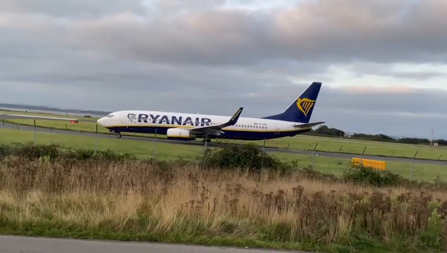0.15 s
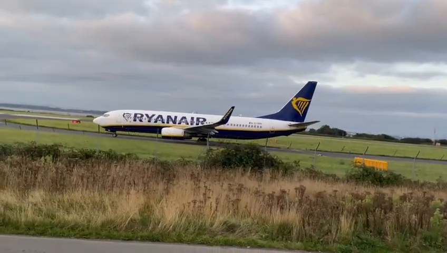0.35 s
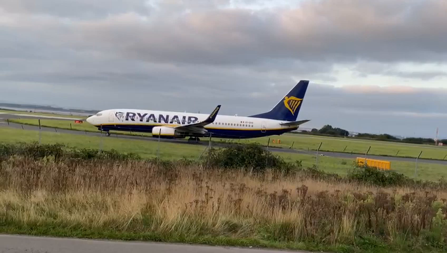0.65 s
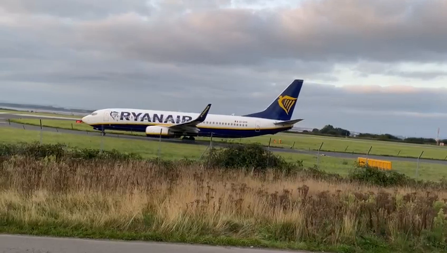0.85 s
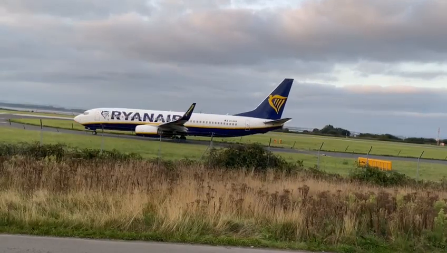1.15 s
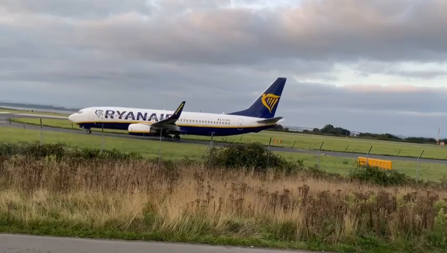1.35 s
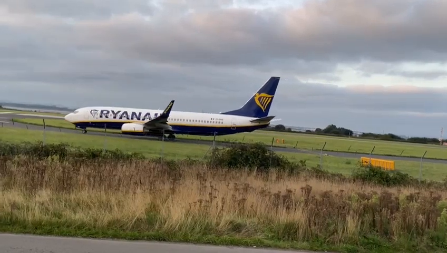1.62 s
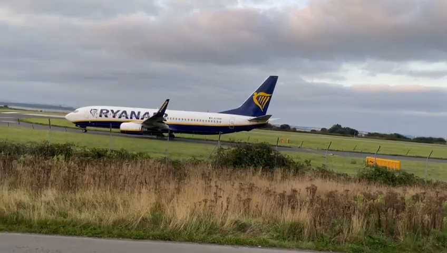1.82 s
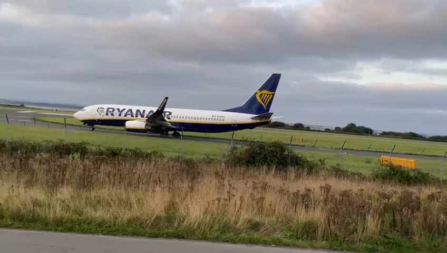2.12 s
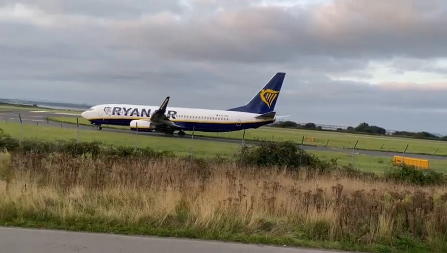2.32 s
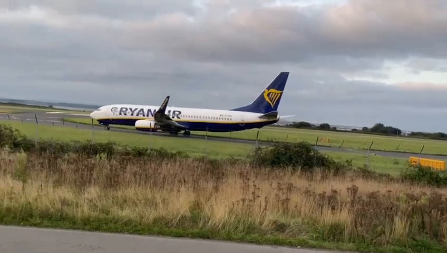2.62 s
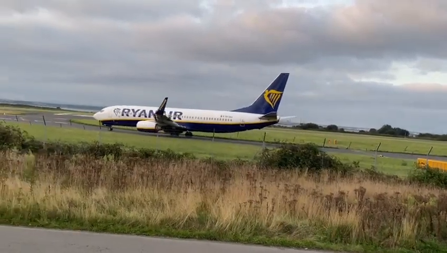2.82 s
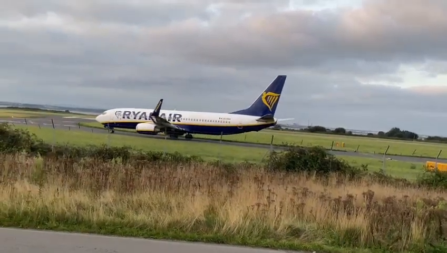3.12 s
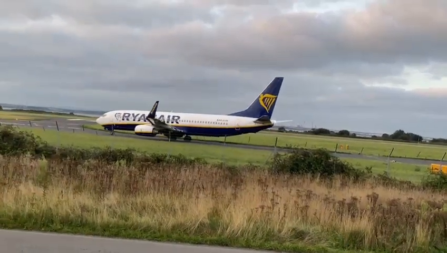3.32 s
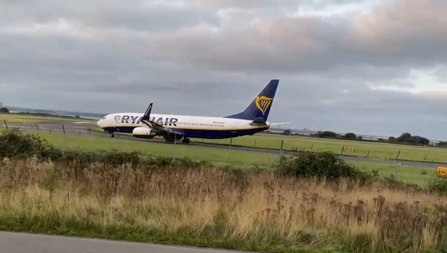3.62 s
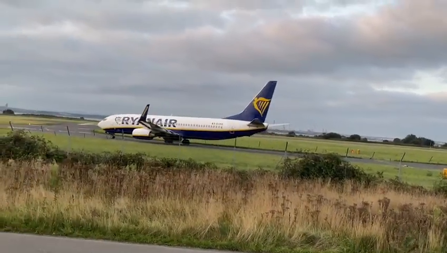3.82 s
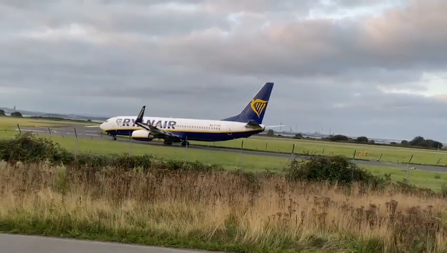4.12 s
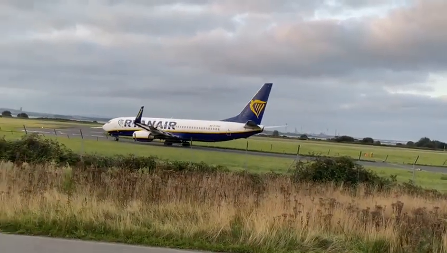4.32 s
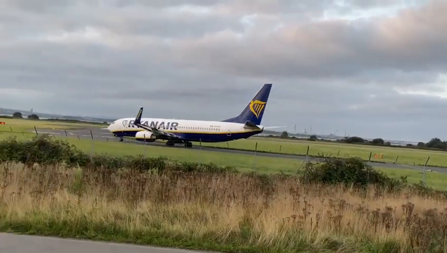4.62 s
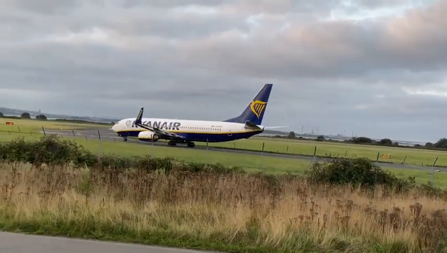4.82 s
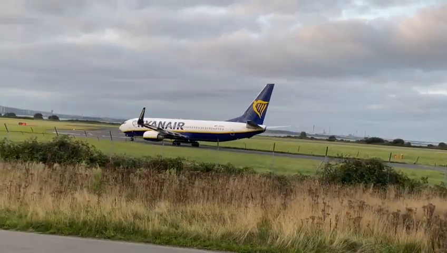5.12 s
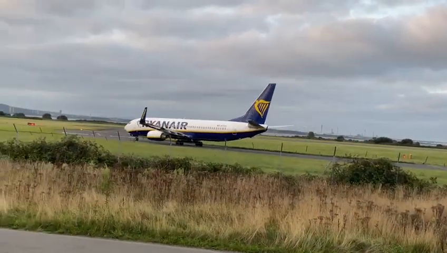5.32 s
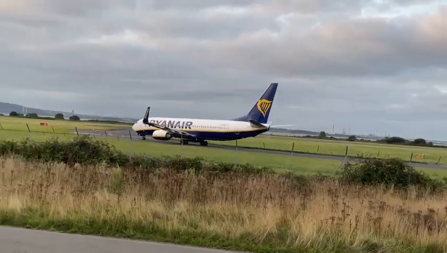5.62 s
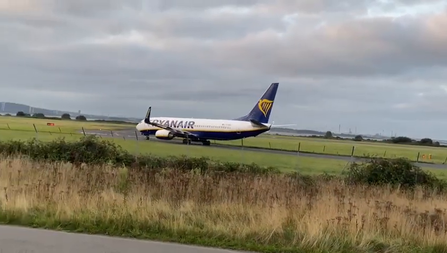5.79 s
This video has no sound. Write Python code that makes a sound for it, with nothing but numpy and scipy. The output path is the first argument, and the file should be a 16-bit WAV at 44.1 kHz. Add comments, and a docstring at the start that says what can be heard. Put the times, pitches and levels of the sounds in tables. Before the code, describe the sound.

An airliner taxis past on an open airfield, heard through a phone at the fence. Its jet engines make a continuous, hissing roar over an uneven low rumble. Thin, high whining tones swell and fade, sinking very slightly in pitch. The roar grows a little louder and higher around the middle, then drops lower and eases as the plane turns away, with more hiss at the end. Moving air makes the sound waver.

```python
"""At the fence of a grass airfield, a phone hears an airliner taxi past and turn away.
The exhaust roars and hisses, burning fuel rumbles, and the spinning blades whine, sinking in pitch as
the plane moves off. A bounce off the soft ground colours the roar, and moving air makes the sound waver.
More roar scatters in from the sides, and a faint low flutter comes and goes."""
import sys
import numpy as np
from scipy import signal
from scipy.fft import rfft, irfft, next_fast_len
from scipy.io import wavfile
from scipy.ndimage import uniform_filter1d

SR = 44100
rng = np.random.default_rng(int(sys.argv[2]) if len(sys.argv) > 2 else 0)


def master_out(mix):
    """Clip the mix to full scale and print it as 16-bit PCM to the path in sys.argv[1]."""
    frames = np.transpose(np.atleast_2d(mix))
    ceiling = np.clip(frames, -1, 1)
    pcm = np.round(ceiling * 32767).astype(np.int16)
    wavfile.write(sys.argv[1], SR, pcm)


N = 262527
TIME = np.arange(N) / SR
SIZE = next_fast_len(N)
HZ = np.arange(SIZE // 2 + 1) * SR / SIZE + 1e-3  # the frequencies of a spectrum


def roar(patchy_db=1.21, hump_octaves=0.16, ground_ms=1.3, ground_radians=-1.29, grass_hz=3000):
    """Exhaust noise, reshaped moment by moment by the turning plane, the ground and the air."""
    # The tail swings round. Each row: time in seconds, relative level in dB, centre of a loud hump in Hz,
    # lift of the hiss in dB, lift of the highest treble in dB.
    exhaust = [(0.0, -27, 736, -5.5, -5), (0.5, -26.5, 795, -3.5, -1.5), (1.27, -26.5, 998, -0.5, 0.5),
               (1.9, -25.5, 1060, -0.5, -2), (2.55, -25.5, 1130, -0.5, -1), (2.98, -24, 1200, -1.5, -6),
               (3.4, -24, 1130, -1, -3), (3.82, -24, 940, -3, -2.5), (4.68, -26, 770, 1, 0),
               (5.1, -26, 720, -1, -0.2), (5.52, -27, 780, 1.5, 1), (5.95, -28.5, 800, 3.5, 5)]
    # The roar's basic tone. Each row: frequency in Hz, level in dB.
    colour = [(170, -36), (200, -18), (270, -8), (330, -3.5), (600, -3), (850, -3.5), (1250, -3),
              (1900, -8), (2150, -11.5), (2650, -13.5), (3900, -21), (4700, -17.5), (7000, -24.5),
              (8100, -22), (9400, -32), (9900, -30), (11600, -74)]
    # The centres, in Hz, of six zones from low roar to highest treble.
    zones_hz = 400, 950, 1700, 2800, 4700, 8000
    # Steady peaks and dips. Each row: frequency in Hz, width in Hz, lift in dB.
    ridges = [(432, 140, 1), (1164, 82, 2.5), (2660, 66, 1), (3540, 250, 2), (552, 21, -5.5),
              (2000, 26, -4), (4080, 110, -1.5), (5820, 320, -1)]
    # Bands that swell or thin for a while. Each row: frequency in Hz, width in Hz, time in seconds,
    # lift in dB, half length in seconds.
    swells = [(247, 44, 2.95, -10, 0.82), (364, 37, 3.8, 2, 0.65), (372, 28, 5.7, 0, 0.71),
              (690, 97, 1.4, -0.5, .5), (2050, 130, 2.62, 4, 0.22), (2680, 410, 5.77, 3.5, 0.32),
              (730, 52, 4.7, 4, 0.24), (4500, 180, 1.05, 3.5, 0.27), (4500, 170, 5.1, -5, 0.77),
              (870, 47, 6.3, 1.5, 0.17), (560, 88, 3.7, -4, 0.71), (9100, 810, 2.3, 5.5, 0.81),
              (2670, 300, .3, 2, .15), (2650, 250, 1.4, 1.5, .3), (1050, 150, 4.9, 2, 0.23),
              (885, 60, 3.4, 3.5, 0.42), (374, 42, 3.0, -1, 0.23)]
    hz, seconds, frames = signal.stft(irfft(noise(colour), SIZE)[:N], SR, nperseg=1024)
    hz = hz[:, None]
    octave = np.log2(hz + 1)
    times, roar_db, *columns = np.transpose(exhaust)
    hump_hz, hiss_db, top_db = (np.interp(seconds, times, column) for column in columns)
    # the lower the hump sits, the more it stands out and the weaker the zones beside it
    height = np.log2(hump_hz / 1000)
    hump_db = 2.5 - 6.5 * height
    zone_db = np.array([2.5 * height, 0 * seconds, 1.5 * height - 0.4, 0.19 * top_db, hiss_db, top_db])
    blend = np.array([np.interp(octave[:, 0], np.log2(zones_hz), row) for row in np.eye(len(zones_hz))])
    db = blend.T @ zone_db + hump_db * bell(octave, np.log2(hump_hz), hump_octaves)
    db += sum(lift * bell(hz, at, width) for at, width, lift in ridges)
    db += sum(lift * bell(hz, at, width) * bell(seconds, when, half)
              for at, width, when, lift, half in swells)
    # swirls of air swell and thin patches a sixth of an octave wide
    swirls = rng.standard_normal((70, len(seconds)))
    swirls = uniform_filter1d(uniform_filter1d(swirls, size=30), size=30)
    patch = np.clip(6 * (octave[:, 0] - 7), 0, 68).astype(int)
    db += patchy_db * swirls[patch] / swirls.std()
    # a late, dull copy off the grass grows with time, boosting some pitches and weakening others
    bounce = (0.022 + 0.026 * seconds) / (1 + (hz / grass_hz) ** 4)
    ground = 1 + bounce * np.exp(1j * (2 * np.pi * hz * ground_ms / 1000 + ground_radians))
    shaped = signal.istft(frames * undb(db) * ground, SR, nperseg=1024)[1][:N]
    running_level = np.sqrt(uniform_filter1d(shaped ** 2, SR))
    return shaped / running_level * undb(np.interp(TIME, times, roar_db) + 2.0)


def rumble(gain_db=-23, evenness=0.42, even_s=0.056, deep_hz=110):
    """A low rumbling noise, smoothed, with brief chance peaks in its deep part placed by hand."""
    # The rumble's tone. Each row: frequency in Hz, level in dB.
    colour = [(20, -33), (35, -18), (43, -20.5), (52, -2.5), (65, 2), (100, -4.5), (155, -8), (175, -13),
              (205, -35), (260, -34), (330, -43)]
    # Chance peaks. Each row: time in seconds, lift of the deep part in dB, half length in seconds.
    peaks = [(0.06, 4, .02), (0.3, 3.5, 0.023), (0.47, 4, 0.047), (1.35, 0, .03), (1.84, 5, 0.026),
             (1.98, 3, .015), (2.31, 7, .04), (2.7, 4, 0.043), (3.02, 7, 0.038), (3.43, 4, 0.034),
             (3.95, 1, .025), (4.25, 1.5, 0.045), (4.52, 6, 0.034), (4.68, 10, 0.014), (5.1, 6, 0.046),
             (5.41, 11, 0.016), (5.9, 8, 0.036)]
    spectrum = noise(colour)
    deep_share = 1 / (1 + (HZ / deep_hz) ** 4)
    deep, upper = (irfft(spectrum * part, SIZE)[:N] for part in (deep_share, 1 - deep_share))
    power = uniform_filter1d(uniform_filter1d(deep ** 2, int(even_s * SR)), int(even_s * SR / 2))
    deep *= (np.mean(power) / power) ** (evenness / 2)
    peak_db = bumps(peaks)
    both = deep * undb(peak_db - 1) + upper * undb(0.16 * peak_db)
    return both / np.sqrt(np.mean(power)) * undb(gain_db - 0.01 * TIME)


def blades(start_hz=2686, sink_hz_per_s=7.5, slowing_hz_per_s2=0.9):
    """Spinning blades whine and sink in pitch together; rough air smears the highest tone."""
    # Each row is a tone: multiple of the rate at which blades pass, pitch wobble in Hz.
    # The last two are the same tone in the two engines.
    blade_tones = [(.996, 3), (.96, 2), (2, 3), (4, 20), (2.474, 3), (2.467, 3)]
    # Each tone's level between swells, in dB.
    resting_db = -59.5, -61, -60.5, -59.5, -62, -61.5
    # A tone swells as its beam sweeps past; one list per tone.
    # Each row: time in seconds, lift in dB, half length in seconds.
    beams = [
        [(1.7, 15, .4), (2.5, 11, 0.25), (3.2, 12, 0.27)],
        [(0.1, 12, .2), (1.8, 7, 0.4), (2.5, 8, .2), (4.2, 11, .12), (5.0, 15, .25), (5.6, 13, .1)],
        [(0.1, 3, .2), (1.45, 10, 0.32), (4.25, 7, .12), (4.7, 11, 0.15), (5.0, 9, .1), (5.55, 11.5, 0.17),
         (5.9, 11, 0.078)],
        [(2.4, 8, 0.65), (5.4, -3, 0.68)],
        [(2.7, -1, 0.27), (3.9, 11, 0.44), (5.3, 10, .25)],
        [(3.4, 6.5, 1), (5.7, 9, 0.47)],
    ]
    hz = start_hz - sink_hz_per_s * TIME + slowing_hz_per_s2 * TIME ** 2 / 2
    levels = [db + bumps(rows) for db, rows in zip(resting_db, beams)]
    tones = sum(wavering_tone(multiple * hz, db, waver_db=2.5, wobble_hz=wobble)
                for (multiple, wobble), db in zip(blade_tones, levels))
    smear = undb(levels[3] / 2) * smeared_tone(4 * hz, db=-25, width_hz=140)
    return tones + smear


def turbine(start_hz=10300, climb_hz_per_s=110):
    """The turbine's thin, flickering hiss climbs as the tail swings round."""
    # The hiss dips, then swells. Each row: time in seconds, lift in dB, half length in seconds.
    swells = [(0.1, -4, .25), (2.2, 5, 1.0)]
    hiss = smeared_tone(start_hz + climb_hz_per_s * TIME, db=-56, width_hz=290, order=3)
    return hiss * undb(bumps(swells) - wander(8))


def hum(hz=326.4, fade_s=0.71):
    """A low, wavering hum dies away at the start."""
    return wavering_tone(hz, db=-44.5, waver_db=4.0, wobble_hz=0.8) / (1 + (TIME / fade_s) ** 4)


def scatter(base_db=-46.5, low_hz=1000, high_hz=2000):
    """Roar is thrown back from the sides, in three bands that swell on their own."""
    # The scattered roar's tone. Each row: frequency in Hz, level in dB.
    colour = [(250, -32), (450, -18), (550, 2), (660, 9), (1000, 6), (1400, -2), (1600, -3.5), (2650, -9.5),
              (3300, -36), (5000, -41), (6000, -70)]
    # Swells of the low, middle and high band. Each row: time in seconds, lift in dB, half length in seconds.
    swells = [
        [(0.15, 1.5, 0.27), (4.5, 4, 0.61)],
        [(.75, 6, .2), (3.8, 4, .55), (5.8, -4, .3)],
        [(0.7, 2, 0.19), (5.0, -2, 1.1)],
    ]
    spectrum = noise(colour)
    ranges = HZ < low_hz, (HZ >= low_hz) & (HZ < high_hz), HZ >= high_hz
    bands = [irfft(spectrum * inside, SIZE)[:N] for inside in ranges]
    swelling = sum(band * undb(bumps(rows)) for band, rows in zip(bands, swells))
    return swelling * undb(base_db) / np.std(sum(bands))


def flutter(base_db=-71):
    """A faint low flutter that comes and goes."""
    # The flutter's tone. Each row: frequency in Hz, level in dB.
    colour = [(20, -1), (70, 2), (150, 0), (250, -17), (400, -18)]
    # Its swells. Each row: time in seconds, lift in dB, half length in seconds.
    swells = [(0.35, 25, 0.26), (1.0, 10, .1), (1.48, 23, 0.12), (2.25, 10, 0.11), (3.65, 12, 0.053),
              (4.0, 17, 0.066), (4.8, 23, 0.17), (5.6, 14, 0.18)]
    low_noise = level(irfft(noise(colour), SIZE)[:N], base_db)
    return low_noise * undb(bumps(swells) + wander(15))


def wavering_tone(hz, db, waver_db, wobble_hz):
    """A tone whose level and pitch shimmer on the way through the air."""
    phase = 2 * np.pi * np.cumsum(hz + wobble_hz * wander(40)) / SR
    return np.sqrt(2) * undb(db + waver_db * wander(24.98)) * np.sin(phase)


def smeared_tone(hz, db, width_hz, order=1):
    """Rough air spreads a tone into a narrow band of noise."""
    smoothing = signal.butter(order, width_hz, fs=SR)
    a, b = (level(signal.lfilter(*smoothing, rng.standard_normal(N)), db) for _ in range(2))
    phase = 2 * np.pi * np.cumsum(hz) / SR
    return a * np.sin(phase) + b * np.cos(phase)


def noise(colour):
    """The spectrum of a noise with this tone, silent outside the listed range."""
    inside = (HZ >= colour[0][0]) & (HZ <= colour[-1][0])
    return rfft(rng.standard_normal(SIZE)) * undb(across(colour)) * inside


def across(points):
    """Join (Hz, value) points into a curve over all frequencies, giving each octave equal room."""
    hz, value = np.transpose(points)
    return np.interp(np.log(HZ), np.log(hz + 1e-3), value)


def wander(per_second):
    """A smooth random drift, roughly between -1 and 1."""
    hold = int(SR / per_second)
    steps = np.repeat(rng.standard_normal(N // hold + 1), hold)
    return 1.3 * uniform_filter1d(uniform_filter1d(steps, hold), hold)[:N]


def bell(x, centre, width):
    """A bell curve, 1 at its centre."""
    return np.exp(-.5 * ((x - centre) / width) ** 2)


def bumps(rows):
    """Add up bell-shaped lifts over time, in dB."""
    return sum(db * bell(TIME, when, half) for when, db, half in rows)


def undb(db):
    """Turn decibels into a multiplier."""
    return 10 ** (np.asarray(db) / 20)


def level(x, db):
    """Scale a sound to this average (rms) level."""
    return x * undb(db) / np.sqrt(np.mean(x ** 2))


def scene(lean_below_hz=2200):
    """The plane is heard ahead; scattered roar, flutter and a slight lean are opposite in left and right."""
    # The roar leans to one side or the other. Each row: time in seconds, left minus right in dB.
    leaning = [(0.0, 0), (0.69, -0.5), (1.54, 0.5), (2.63, 0), (4.03, 1.0), (5.47, 0), (5.95, 0.5)]
    jet = roar()
    ahead = jet + rumble() + blades() + turbine() + hum()
    body = irfft(rfft(jet, SIZE) * np.exp(-(HZ / lean_below_hz) ** 8), SIZE)[:N]
    lean_db = np.interp(TIME, *np.transpose(leaning))
    lean = np.tanh(lean_db * np.log(10) / 40) * body
    return ahead + (scatter() + flutter() + lean) * np.array([[1], [-1]])


def record(dry, in_step=0.68, late_s=0.04, bass_cut_hz=38, top_hz=11550):
    """The phone's two microphones differ in level and timing; deep bass and the highest treble are cut."""
    # They fall out of step in the treble. Each row: frequency in Hz, left's lag in half cycles.
    lags = [(20, 0), (7500, 0), (8000, .45), (8600, 1), (9560, 1), (9700, 1.15), (10160, 1.65),
            (10500, 1.88), (10900, 2), (12000, 2)]
    # Their uneven levels. Each row: frequency in Hz, left minus right in dB.
    tilt = [(20, -0.5), (190, 0), (350, -0.56), (520, -2), (760, -1), (1140, 1), (1550, -1.4), (2300, -0.5),
            (3000, 1.5)]
    lag = across(lags)
    tilt_db = across(tilt) * (HZ < tilt[-1][0])
    left_gain = undb(tilt_db / 2) * np.exp(-.5j * np.pi * lag)
    left, right = rfft(dry, SIZE) * np.array([left_gain, 1 / left_gain])
    # in the treble, part of the difference between left and right arrives late
    direct = np.where(lag > 0, in_step, 1)
    late = np.sqrt(1 - direct ** 2) * np.exp(-2j * np.pi * HZ * late_s)
    side = (left - right) / 2 * (direct + late)
    stereo = irfft((left + right) / 2 + side * np.array([[1], [-1]]), SIZE)[:, :N]
    stereo = signal.sosfilt(signal.butter(2, bass_cut_hz, "high", fs=SR, output="sos"), stereo)
    return signal.sosfilt(signal.ellip(12, .2, 80, top_hz, fs=SR, output="sos"), stereo)


dry = scene()
out = record(dry)
master_out(out)
```